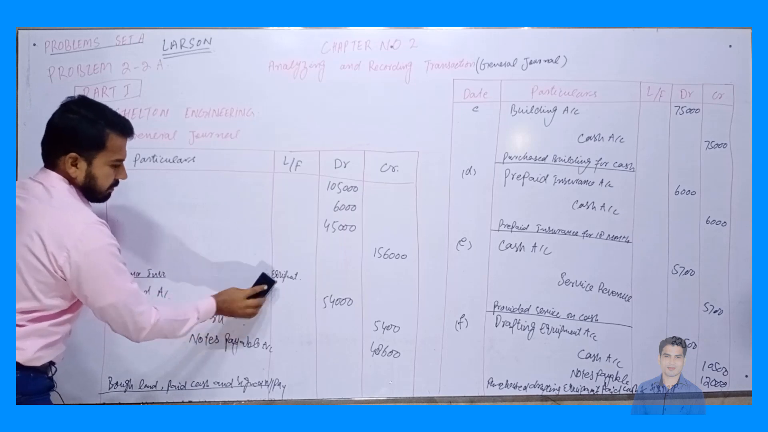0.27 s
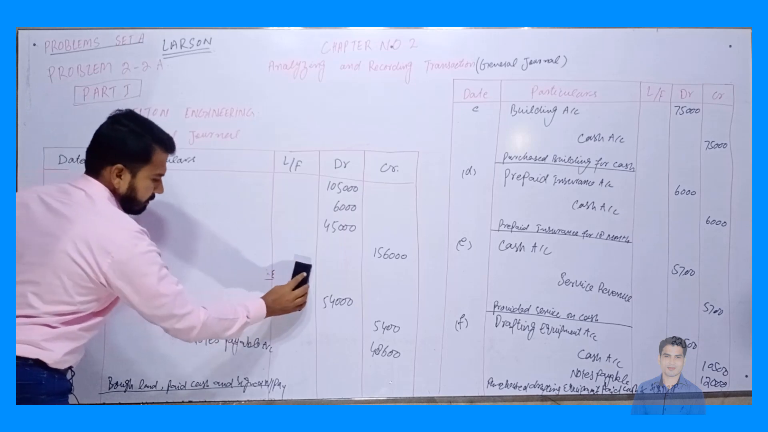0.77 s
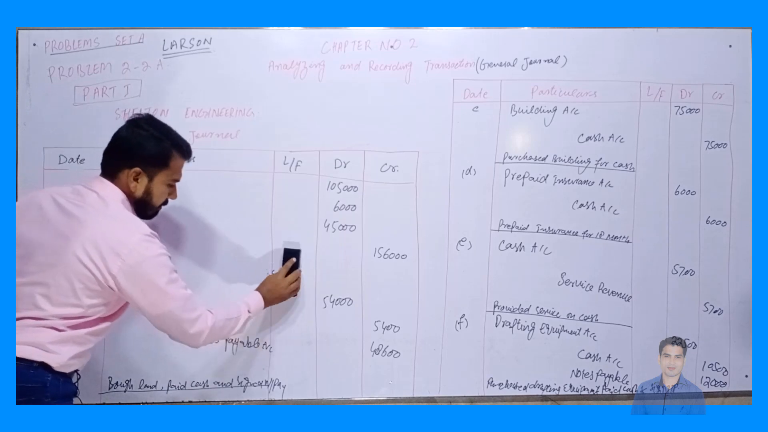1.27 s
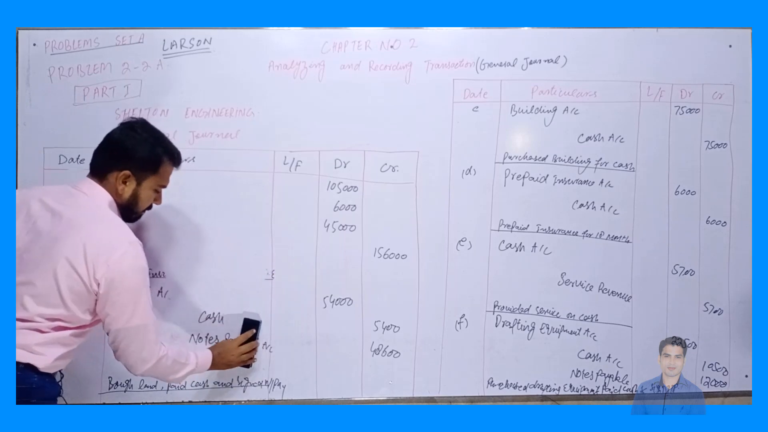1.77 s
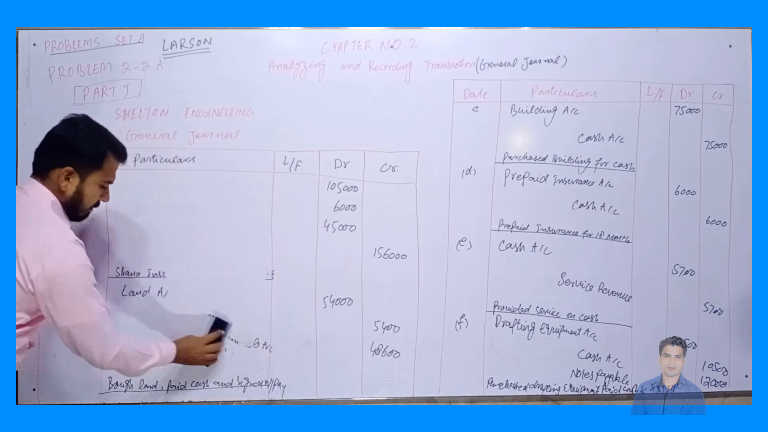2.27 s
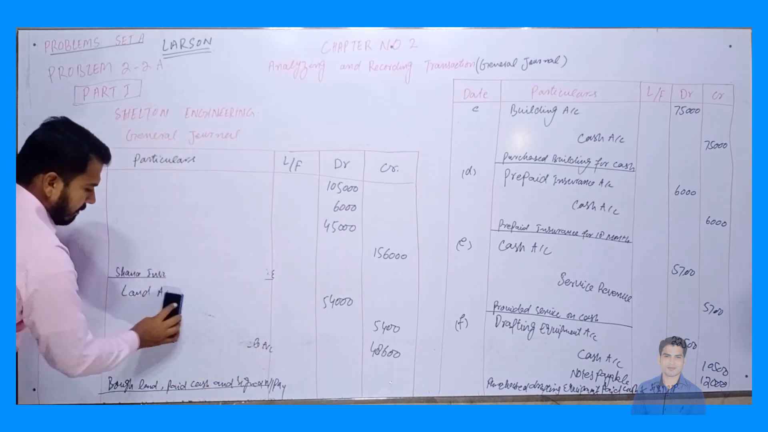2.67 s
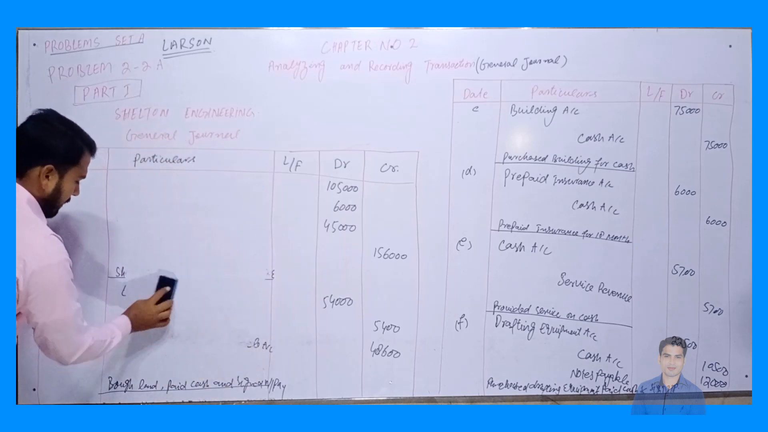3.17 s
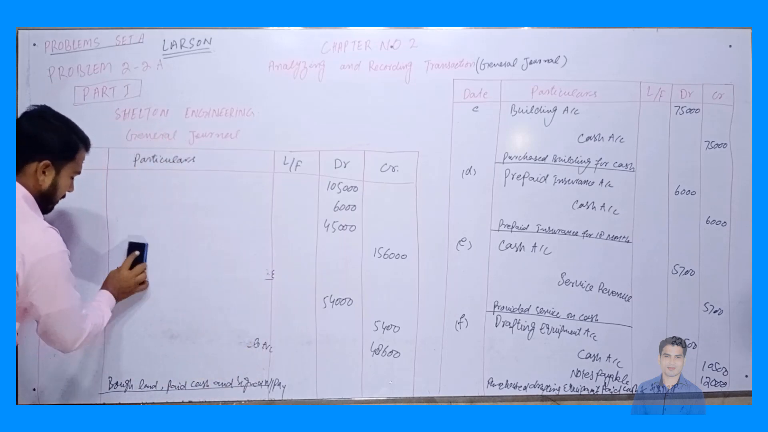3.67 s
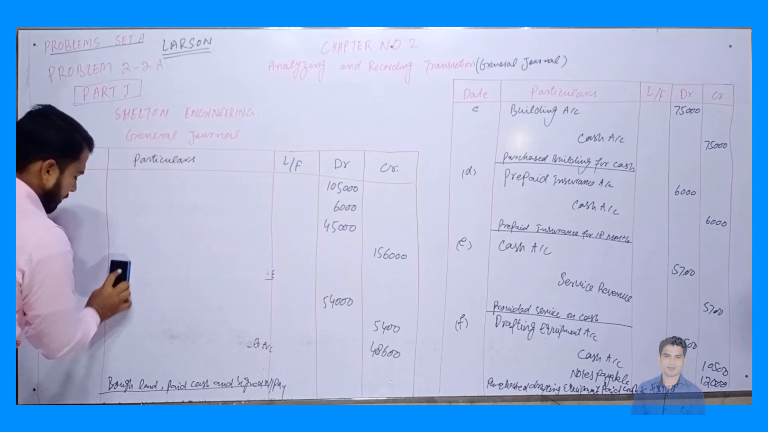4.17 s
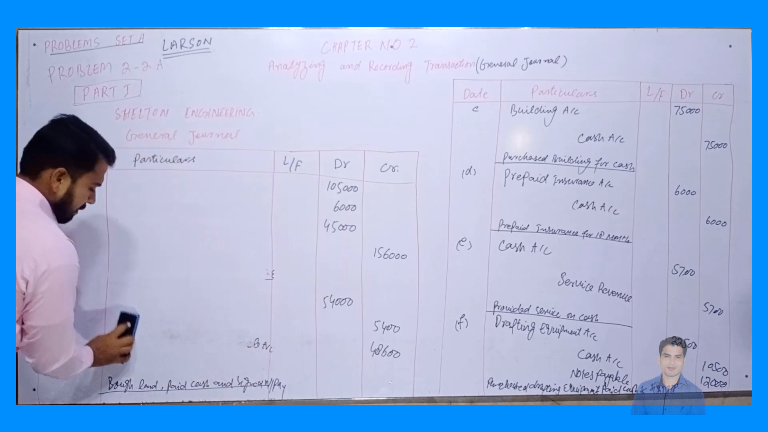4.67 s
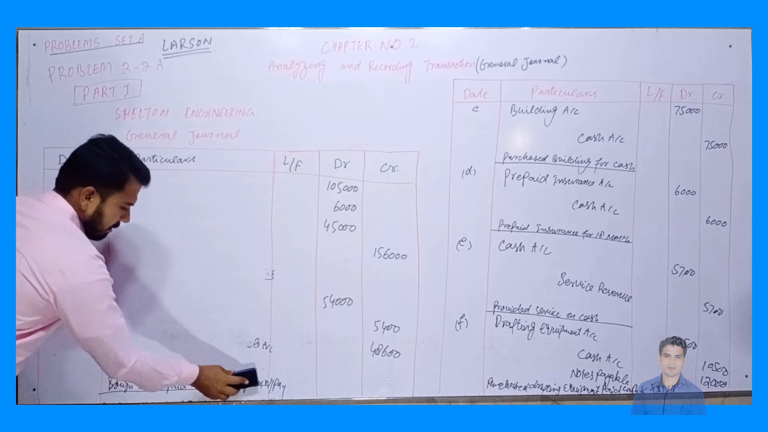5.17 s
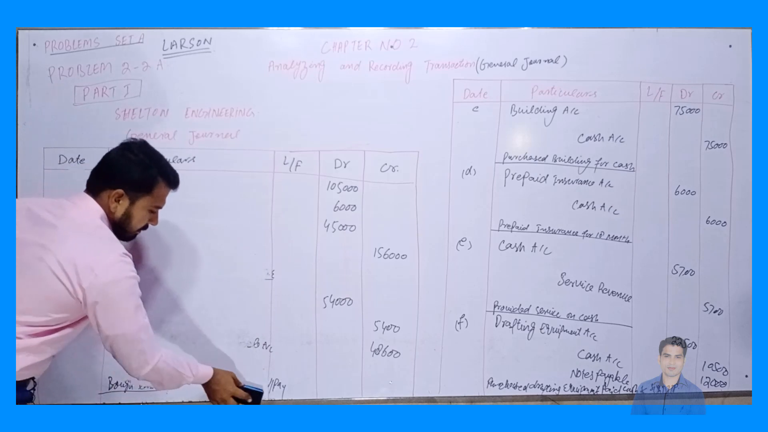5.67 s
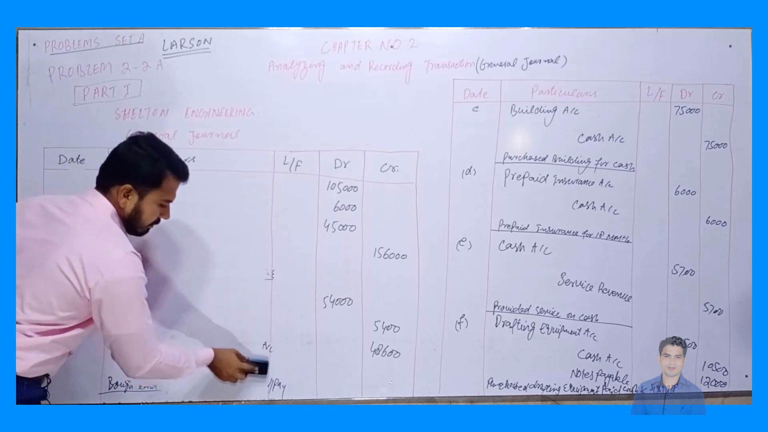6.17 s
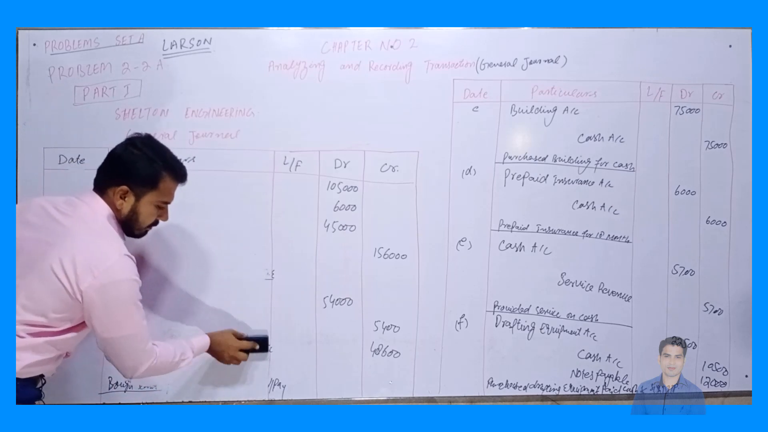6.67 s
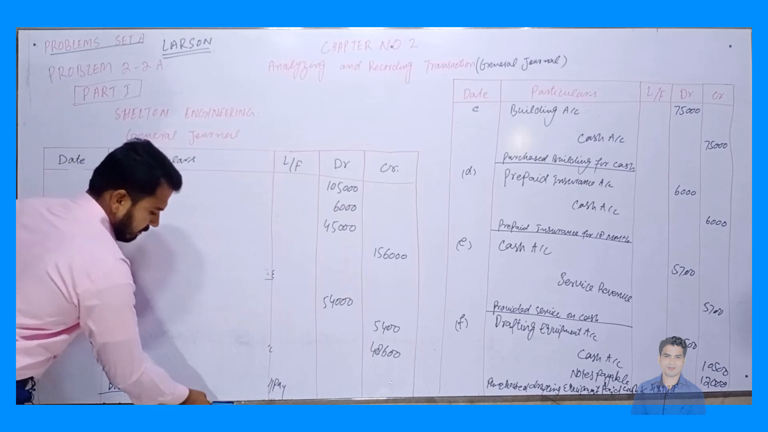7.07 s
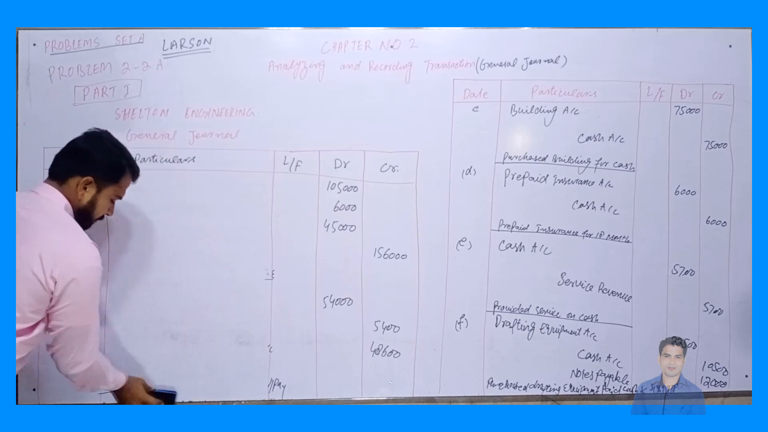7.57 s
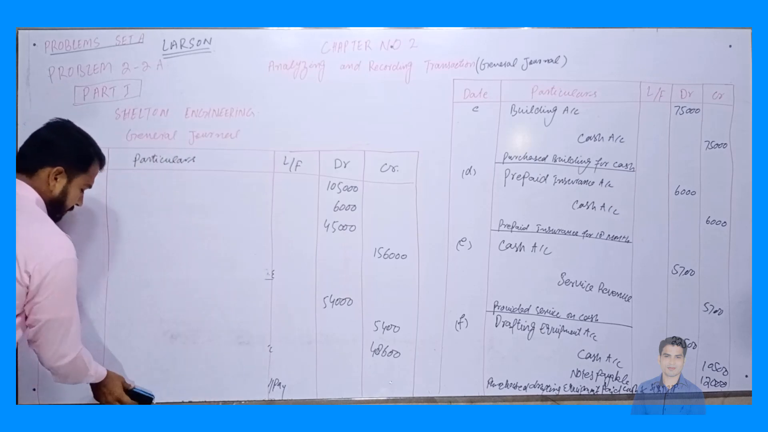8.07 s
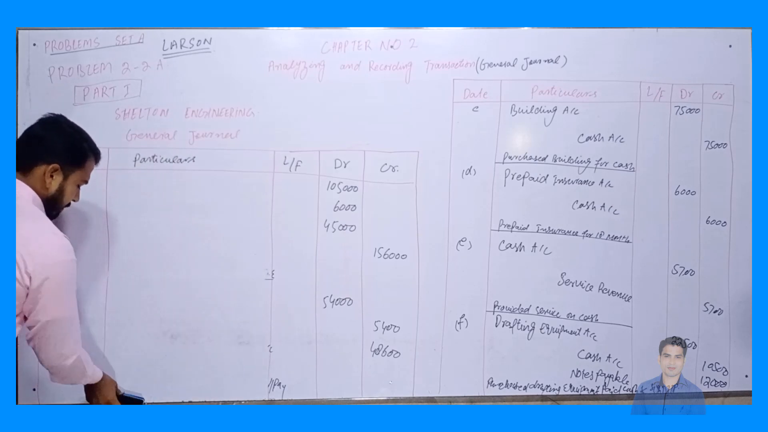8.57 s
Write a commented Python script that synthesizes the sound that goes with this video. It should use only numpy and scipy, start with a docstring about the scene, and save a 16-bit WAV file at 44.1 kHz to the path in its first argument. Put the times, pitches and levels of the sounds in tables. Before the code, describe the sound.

A felt duster wipes a whiteboard close to one small microphone in a lightly echoing classroom. Bright, hissy strokes start moderately, pause briefly, and resume after a low panel thump. From about two seconds they grow stronger and nearly continuous. Around seven seconds the duster's hard back knocks the board and frame several times with a scrape, then softer rubbing goes on to the end.

```python
"""In a classroom, a felt duster wipes a whiteboard stroke after stroke before one small microphone.
Clicks of slipping felt fibres make hiss, fizz and drag that follow the hand, and a murmur of the panel
that follows its pressure. Short noise bursts are sudden slips; decaying low modes are thuds of the panel;
higher modes and a noise crack are taps of the duster's hard back. Sparse echoes give the room."""
import sys
import numpy as np
from scipy import signal
from scipy.io import wavfile
from scipy.ndimage import uniform_filter1d

SR = 44100
rng = np.random.default_rng(int(sys.argv[2]) if len(sys.argv) > 2 else 0)


def store_wav(level_fs):
    """Save 16-bit WAV to argv[1]."""
    pcm = np.round(np.clip(np.atleast_2d(level_fs), -1, 1) * 32767)
    wavfile.write(sys.argv[1], SR, pcm.T.astype(np.int16))


N = 388080  # samples, 8.8 s

# Source levels below are those at the source, ahead of the room and the microphone.


def gain_of(db):
    """Decibels to an amplitude factor."""
    return 10 ** (np.asarray(db) / 20)


def evened(x):
    """Scales to rms 1."""
    return x / np.sqrt(np.mean(x ** 2) + 1e-20)


def read(points, hz):
    """Reads the second column of a table on a log-frequency axis."""
    f, value = np.transpose(points)
    return np.interp(np.log(hz + 1), np.log(f + 1), value)


def follow(rows):
    """Every column of a curve table, joined by straight lines sample by sample."""
    s, *columns = np.transpose(rows)
    return [np.interp(np.arange(N) / SR, s, column) for column in columns]


def add(mix, s, sound):
    """Mixes a sound in at time s, cut off where the mix ends."""
    part = mix[round(s * SR):][:len(sound)]
    part += sound[:len(part)]


def blend(first, second, share):
    """Equal-power mix of two sounds; share 1 is all second."""
    angle = np.pi / 2 * np.clip(share, 0, 1)
    return np.cos(angle) * first + np.sin(angle) * second


def smoothed(field, bins, frames):
    """Averages a random field over neighbouring frequency bins, then time frames."""
    return uniform_filter1d(uniform_filter1d(field, size=bins, axis=0), size=frames, axis=1)


def coloured(x, points, patchy_db, size):
    """Shapes x by a spectrum whose level drifts in random patches of time and frequency; rms 1."""
    overlap = size * 3 // 4
    hz, _, z = signal.stft(x, SR, nperseg=size, noverlap=overlap)
    patches = evened(smoothed(rng.standard_normal(z.shape), bins=7, frames=15))
    level_db = read(points, hz)[:, None] + patchy_db * patches
    shaped = signal.istft(z * gain_of(level_db), SR, nperseg=size, noverlap=overlap)[1]
    return evened(shaped[:N])


def fibres(per_s, spread_db):
    """Tiny slips of felt fibres: a dense random train of clicks of uneven size."""
    clicks = rng.random(N) < per_s / SR
    # a positive spread makes a few clicks larger, a negative one a few smaller
    size_db = spread_db * np.minimum(rng.exponential(1, N), 4)
    return clicks * rng.standard_normal(N) * gain_of(size_db)


# Echo decay of the classroom: f/Hz, t60/s
ROOM_DECAY = [(100, 0.324), (400, 0.33), (1500, 0.1), (6000, 0.057), (15000, 0.11)]


def classroom(x):
    """Sparse echoes of random sign, each band dying at its own speed."""
    echoes = np.zeros(SR // 2)
    at = np.arange(300, len(echoes) - 20, 20)
    echoes[at + rng.integers(0, 20, len(at))] = rng.choice([-1., 1.], len(at))
    hz, t, z = signal.stft(echoes, SR, nperseg=256)
    decay_db = -60 * t / read(ROOM_DECAY, hz)[:, None]
    tail = signal.istft(z * gain_of(decay_db), SR, nperseg=256)[1]
    return signal.fftconvolve(x, tail / np.linalg.norm(tail))[:N]


def struck(modes, best_hz, octaves, damping, contact_cycles):
    """Rings a set of modes, strongest near the pitch that the blow reaches best; peak 1."""
    t = np.arange(SR // 2)[:, None] / SR
    contact = contact_cycles / best_hz  # s
    hz, db, t60 = np.transpose(modes)
    reach_db = -6 * (np.log2(hz / best_hz) / octaves) ** 2
    decay_db = -60 * t / (t60 * damping)
    ring = gain_of(db + reach_db + decay_db) * np.sin(2 * np.pi * hz * (t - contact))
    # the ring builds while the contact lasts
    swell = np.sin(np.pi / 2 * np.minimum(t[:, 0] / contact, 1)) ** 2
    ring = ring.sum(axis=1) * swell
    return ring / abs(ring).max()


# Modes of the whiteboard panel: f/Hz, relative level/dB, t60/s before the hand's damping
PANEL_MODES = [(66.5, -19, 0.71), (84.2, 8.5, 0.25), (121.5, 2.5, 0.111), (127.6, 5.5, 0.25),
               (170, 3, 0.22), (195.6, 6, 0.21), (230, -3.5, 0.21), (249, -5, 0.31), (262, -0.5, 0.33),
               (293, -3, 0.53), (311, -7, 0.46), (365, -21, .2), (420, 4, 0.35), (472, 7, 0.198),
               (549, 2, 0.21)]
# Pushes and blows on the panel: t/s, peak level/dB, pitch struck best f/Hz, damping by the hand (factor on t60)
PANEL_THUDS = [(0.563, -33.5, 232, 0.55), (0.576, -14.5, 245, 0.46), (1.826, -42.5, 178, 0.44),
               (2.258, -50.5, 303, 0.45), (3.071, -50.5, 101, 0.38), (3.489, -50, 104, 0.39),
               (3.668, -59, 340, 1), (4.106, -53.5, 179, 0.93), (4.272, -55, 330, 0.47),
               (4.512, -53, 132, 1), (4.819, -55, 322, 0.95), (5.359, -54, 370, 0.94),
               (5.984, -43.5, 116, 0.22), (6.363, -49, 115, 0.36), (7.011, -30.5, 260, 0.22),
               (7.255, -28, 189, 0.56), (7.615, -65, 297, 0.6), (7.743, -51, 316, 0.7),
               (7.926, -50, 337, 0.61), (8.653, -53, 307, 0.78)]


def thuds():
    """Soft pushes and blows set the low modes of the panel ringing."""
    out = np.zeros(N)
    for s, db, best_hz, damping in PANEL_THUDS:
        ring = struck(PANEL_MODES, best_hz, octaves=0.48, damping=damping, contact_cycles=1.68)
        add(out, s, gain_of(db) * ring)
    return out


# Modes of the duster's hard back: f/Hz, relative level/dB, t60/s before damping
DUSTER_MODES = [(568, 4, 0.022), (692, 0, 0.021), (806, 12, 0.018), (1096, -3, 0.057), (1320, 6.5, 0.023),
                (1433, -0.5, 0.09), (1850, 6, 0.0054), (2275, 14, 0.05), (2700, 23, 0.06),
                (4420, -13.5, .02), (5190, -8, 0.022), (6450, -6.5, .015)]
# Its taps on board and frame: t/s, peak level of the ring/dB, pitch struck best f/Hz,
# spread/octaves (6 dB down), gain of the crack against that level/dB
DUSTER_TAPS = [(0.575, -29.5, 1060, 0.69, -19), (1.826, -54, 1700, 0.33, -6), (4.212, -39, 730, 0.23, -25),
               (5.043, -41, 656, 0.54, -29), (5.494, -46.5, 734, 0.27, -18), (5.709, -48, 1600, 0.54, -15),
               (7.013, -27.5, 2400, 1.1, -13), (7.013, -17.5, 876, 0.43, -25),
               (7.192, -40.5, 1330, 0.44, 6), (7.255, -24.5, 625, 0.58, -8), (7.26, -23, 1120, 0.44, -4),
               (7.262, -22.5, 5400, 0.28, -25), (7.611, -28.5, 1450, 0.89, -13)]


def taps():
    """Hard contacts: a short ring of the duster and a crack of noise."""
    out = np.zeros(N)
    t = np.arange(2000) / SR
    for s, db, best_hz, octaves, crack_db in DUSTER_TAPS:
        ring = struck(DUSTER_MODES, best_hz, octaves, damping=0.73, contact_cycles=1.26)
        add(out, s, gain_of(db) * ring)
        grit = np.diff(rng.standard_normal(len(t)), prepend=0)  # differencing favours the treble
        rise = 1 - np.exp(-t / 0.00052)
        fade_db = -60 * t / 0.016
        add(out, s, gain_of(db + crack_db + fade_db) * grit * rise)
    return out


# Spectrum of a dull skid: f/Hz, relative level/dB
SKID_SPECTRUM = [(150, -10), (400, -1.5), (800, -8.5), (1500, -4), (2300, -4.5), (3500, -2), (7000, -17.5)]
# Sudden slips, as the felt breaks loose or the duster's edge skids on the frame:
# t/s, level/dB (rms ahead of the envelope), fade time constant/s, brightness (0-1)
SUDDEN_SLIPS = [(1.822, -67, 0.029, 0.4), (2.715, -44, 0.04, 1), (4.386, -53, 0.04, 0.97),
                (5.349, -48, 0.11, 0.34), (5.702, -43.5, 0.056, 0.78), (6.845, -54, 0.033, 1),
                (7.007, -31, 0.053, 0.59), (7.102, -38.5, 0.03, 0.8), (7.187, -46, 0.052, 0.54),
                (7.247, -41, 0.044, 0.36), (7.607, -36.5, 0.055, 0.69)]


def slips():
    """Each slip starts within milliseconds, holds, and fades as the grip settles."""
    dull = coloured(fibres(per_s=4000, spread_db=1.5), SKID_SPECTRUM, patchy_db=-2.5, size=256)
    bright = coloured(fibres(per_s=15000, spread_db=4), HISS_SPECTRUM, patchy_db=1.2, size=256)
    out = np.zeros(N)
    for s, db, length, share in SUDDEN_SLIPS:
        t = np.arange(0, 2 * length, 1 / SR)
        shape = (1 - np.exp(-t / 0.0025)) * np.exp(-(t / length) ** 1.9)
        here = slice(round(s * SR), round(s * SR) + len(t))
        add(out, s, gain_of(db) * shape * blend(dull[here], bright[here], share))
    return out


# Strokes of the hand, each lasting to the next: t/s, hiss level at the turn/dB, hiss level at full speed/dB,
# fastest moment (0-1 of the stroke), peakedness (power of a sine arch), fizz against hiss/dB, drag level/dB
HAND_STROKES = [(0.0, -47.5, -43.5, 0.36, 1, -3, -61.5), (0.19, -57.5, -53.0, 0.13, 1.6, -13.0, -63.5),
                (0.329, -70.0, -66, 0.13, 0.98, -25, -61), (0.557, -86, -52, 0.24, 1.3, -12, -60.5),
                (0.649, -55.5, -44.5, 0.61, 1.5, -3, -67), (0.873, -52, -45.5, 0.46, 0.8, -6.5, -68.5),
                (1.038, -48.5, -44, 0.56, 1.2, -3, -57.5), (1.207, -50, -46, 0.64, 0.8, -7.0, -66.5),
                (1.388, -49.5, -45.5, 0.2, 1.77, -2, -58.5), (1.569, -73, -65.0, 0.25, 1.8, -20, -64),
                (1.815, -79, -56.5, 0.7, 0.88, -8, -66), (1.86, -54, -35.5, 0.72, 1.6, -8, -61.5),
                (2.164, -45.5, -37.5, 0.36, 1.43, -3.5, -58.5), (2.454, -50.5, -36.0, 0.78, 1.8, -4.5, -58),
                (2.669, -50.5, -39.5, 0.53, 0.93, -2, -57.5), (2.849, -47, -37.5, 0.65, 0.93, -5.5, -54),
                (3.093, -45, -40.5, 0.67, 1, -1.5, -62), (3.278, -46, -37.5, 0.44, 1.2, -7, -54.0),
                (3.512, -44, -43.5, 0.64, 0.8, -2.5, -64), (3.677, -44.5, -42, 0.2, 0.87, -6.5, -59.5),
                (3.796, -46.0, -42.5, 0.39, 0.8, -3.5, -58.5),
                (3.951, -56.0, -45.5, 0.5, 0.89, -5.5, -61.5), (4.136, -62, -45.0, 0.44, 1.06, -3.5, -62.5),
                (4.365, -73, -45, 0.6, 1, -7, -62.5), (4.53, -57.5, -43.5, 0.62, 0.89, -9, -58),
                (4.729, -44, -41.5, 0.64, 0.72, -4.5, -60.5), (5.0, -44.5, -47, 0.8, 1.3, -4.5, -64.5),
                (5.293, -48.5, -42.0, 0.57, 1, -7, -55), (5.443, -61, -42, 0.27, 1, -7.5, -57.0),
                (5.687, -47.5, -48, 0.4, 0.8, -7.5, -66), (5.777, -55.5, -38.5, 0.7, 0.97, -6.0, -60),
                (5.996, -54.5, -39.5, 0.53, 0.94, -2.5, -60), (6.186, -55, -37.5, 0.51, 1.1, -5, -56.5),
                (6.38, -58, -39.5, 0.44, 1.06, -4, -65), (6.589, -56, -39.5, 0.53, 0.99, -5.5, -60),
                (6.82, -64, -39.5, 0.6, 0.98, -3.5, -70.5), (7.0, -41.5, -39, 0.52, 0.8, -6, -41),
                (7.089, -47, -42.5, 0.2, 0.8, -5, -46), (7.179, -47, -44, 0.55, 0.8, -13.5, -47),
                (7.29, -45, -48, 0.1, 1.1, -10, -50), (7.439, -57.5, -42, 0.62, 1.7, -5, -60.5),
                (7.702, -45.5, -41.5, 0.53, 0.8, -6.0, -56.0), (7.947, -62, -41.5, 0.35, 1.03, -4.5, -59.5),
                (8.2, -64, -44.0, 0.52, 1.17, -8, -54), (8.406, -54, -42.0, 0.56, 1.4, -6.5, -60.5),
                (8.541, -46, -44.5, 0.45, 0.8, -12, -48), (8.58, -56, -45.5, 0.45, 0.94, -11.5, -56),
                (8.64, -49.0, -44, 0.4, 0.86, -5.5, -58.5)]
LAST_TURN_S, LAST_TURN_DB = 8.85, -54
FIZZ_STEEP, DRAG_STEEP = 1.43, 0.66  # dB lost per dB of hiss lost as the hand slows


def hand():
    """Each stroke arches from one turn through its fastest moment to the next; hiss, fizz, drag in dB."""
    start, turn_db, top_db, fastest, peaked, fizz_db, drag_db = np.transpose(HAND_STROKES)
    t = np.arange(N) / SR
    edges = np.append(start, LAST_TURN_S)
    stroke = np.clip(np.searchsorted(edges, t, "right") - 1, 0, len(start) - 1)
    part = np.clip((t - edges[stroke]) / np.diff(edges)[stroke], 0, 1)
    lean = fastest[stroke]
    speeding = np.minimum(part / lean, (1 - part) / (1 - lean))
    arch = np.sin(np.pi / 2 * speeding) ** peaked[stroke]
    # past the fastest moment, the hand heads for the next turn's level
    at_turn = gain_of(np.append(turn_db, LAST_TURN_DB)[stroke + (part > lean)])
    at_top = gain_of(top_db[stroke])
    hiss = 20 * np.log10(at_turn + (at_top - at_turn) * arch)
    middle = start + fastest * np.diff(edges)
    slowed_db = hiss - np.interp(t, middle, top_db)
    fizz = hiss + np.interp(t, middle, fizz_db) + (FIZZ_STEEP - 1) * slowed_db
    drag = np.interp(t, middle, drag_db) + DRAG_STEEP * slowed_db
    return hiss, fizz, drag


# The duster leaning on the panel: t/s, drag brightness (0-1), panel murmur level/dB, murmur depth (0-1)
HAND_PRESSURE = [(0.0, 0.41, -69.5, 0.52), (.5, .4, -69, .3), (.66, 0.36, -56, 0.6),
                 (.78, 0.4, -64.5, 0.23), (.87, 0.54, -76.5, 0.67), (1.45, 0.91, -75.5, 0.6),
                 (1.6, 0.34, -79, 0.1), (1.68, 0.2, -56, 0.1), (1.78, 0.8, -83, 0.7),
                 (2.05, 0.62, -68.5, .1), (2.6, 0.2, -63.5, 0.5), (3.0, 0.68, -72.5, 0.38),
                 (3.45, 0.5, -68, 0.34), (4.35, 0.86, -71.5, .5), (4.9, 0.33, -62, 0.2),
                 (5.25, 0.6, -74, 0.47), (5.5, 0.56, -69, 0.54), (5.9, 0.64, -78.5, 0.42),
                 (6.96, 0.69, -75.5, 0.6), (7.04, 0.78, -61, 0.8), (7.17, 0.54, -58, .6),
                 (7.23, 0.23, -51.5, .4), (7.36, 0.41, -58, .3), (7.5, 0.46, -77, 0.3),
                 (7.95, 0.71, -61, 0.5), (8.06, 0.7, -63, 0.36), (8.12, .5, -79, .5),
                 (8.3, 0.6, -75.5, 0.6), (8.55, .85, -69.5, 0.6), (8.8, 0.75, -79, .5)]
# Spectra of the rubbing felt and the murmuring panel, each: f/Hz, relative level/dB
HISS_SPECTRUM = [(500, -49), (1300, -15), (1900, -13), (2300, -2.5), (2700, -0.5), (4000, -1.5),
                 (7000, 4.5), (8000, -5.5), (10000, -17.5)]  # also colours the bright slips
FIZZ_SPECTRUM = [(5000, -26), (7000, -5), (8500, -3.5), (16000, -4.5)]
DULL_DRAG = [(300, -20), (550, -2.5), (800, -1), (1100, -6.5), (1800, -19.5)]
BRIGHT_DRAG = [(500, -23), (900, -12), (1250, 0.5), (1700, 1.5), (2400, 4.5), (3500, -23)]
HIGH_MURMUR = [(120, -1.5), (220, 4.5), (312, 11.5), (380, 6.5), (600, -71.5)]
DEEP_MURMUR = [(30, -47.5), (60, 9), (120, 12.5), (190, 2), (300, -44)]


def rubbing():
    """Hiss, fizz and drag follow hand speed; murmur and the colour of the drag follow pressure."""
    hiss_db, fizz_db, drag_db = hand()
    bright, murmur_db, depth = follow(HAND_PRESSURE)
    hiss = coloured(fibres(per_s=25000, spread_db=-2.5), HISS_SPECTRUM, patchy_db=0.95, size=512)
    fizz = coloured(fibres(per_s=20000, spread_db=1.5), FIZZ_SPECTRUM, patchy_db=1.4, size=512)
    drags = [coloured(fibres(per_s=6000, spread_db=2.5), colour, patchy_db=2.5, size=1024)
             for colour in (DULL_DRAG, BRIGHT_DRAG)]
    murmurs = [coloured(fibres(per_s=1500, spread_db=3.1), colour, patchy_db=2.5, size=2048)
               for colour in (HIGH_MURMUR, DEEP_MURMUR)]
    felt = gain_of(hiss_db) * hiss + gain_of(fizz_db) * fizz
    drag = gain_of(drag_db) * blend(*drags, bright)
    murmur = gain_of(murmur_db) * blend(*murmurs, depth)
    return felt + drag + murmur


# How far the panel's narrow resonances wander: f/Hz, rms depth/dB
WANDER_DEPTH = [(100, 3.5), (1800, 3.8), (2600, 2.4), (4000, 1.5), (15000, 1.6)]


def wandering(x):
    """As the duster travels, narrow resonances of the panel swell and fade at random under it."""
    hz, _, z = signal.stft(x, SR, nperseg=1024, noverlap=768)
    field = rng.standard_normal(z.shape)
    for _ in range(2):
        field = smoothed(field, bins=3, frames=17)
    gain = gain_of(read(WANDER_DEPTH, hz)[:, None] * evened(field))
    gain = gain / np.sqrt((gain ** 2).mean(axis=1, keepdims=True))  # mean power gain 1 in every band
    return signal.istft(z * gain, SR, nperseg=1024, noverlap=768)[1][:N]


def scene():
    """Direct sound of duster and panel with the room beneath, the same in both channels."""
    hits = thuds() + taps()
    rub = wandering(rubbing()) + slips()
    room = classroom(gain_of(-14.5) * hits + gain_of(-18) * rub)
    mono = rub + hits + room
    return np.array([mono, mono])


# Peaks and dips of the small microphone: f/Hz, level/dB
MICROPHONE_RESPONSE = [(1500, 4), (2370, 1), (3200, -6.5), (4200, 1.5), (4910, 4), (5700, -1.5),
                       (6580, 1.5), (7100, -8), (7800, -11), (9090, 3.5), (11000, -0.5), (13600, -7.5),
                       (14700, 2), (15500, 5.5)]
EDGE_HZ = 15480  # upper band limit


def record(dry):
    """The small microphone's peaks and dips as a causal filter, bass cut, band limit."""
    hz = abs(np.fft.fftfreq(4096, 1 / SR))
    log_gain = np.log(gain_of(read(MICROPHONE_RESPONSE, hz)))
    # minimum phase: the Hilbert transform of the log gain
    spectrum = np.exp(log_gain - 1j * signal.hilbert(log_gain).imag)
    response = np.fft.ifft(spectrum).real[:1024]
    heard = signal.oaconvolve(dry, response[None])[:, :N]
    bass_cut = signal.butter(1, 45, "high", fs=SR, output="sos")
    heard = signal.sosfilt(bass_cut, heard)
    band_limit = signal.firwin(1023, EDGE_HZ, window=("kaiser", 11), fs=SR)
    return signal.oaconvolve(heard, band_limit[None], "same")


dry = scene()
out = record(dry)
store_wav(out)
```